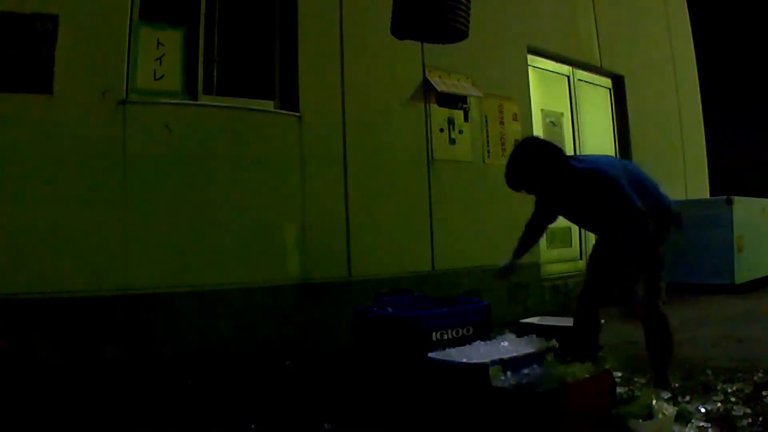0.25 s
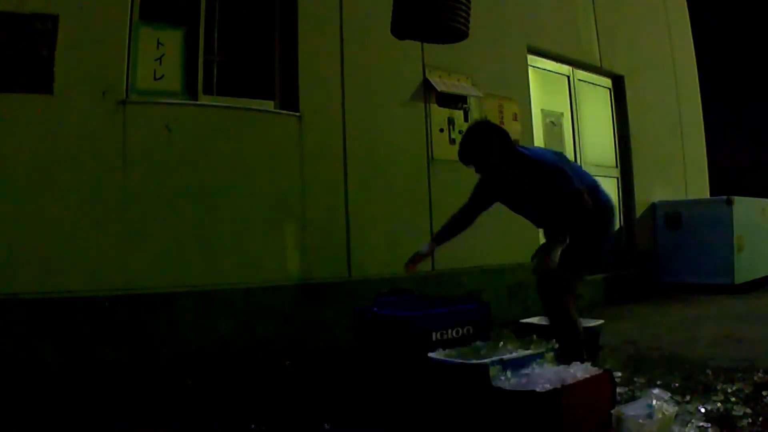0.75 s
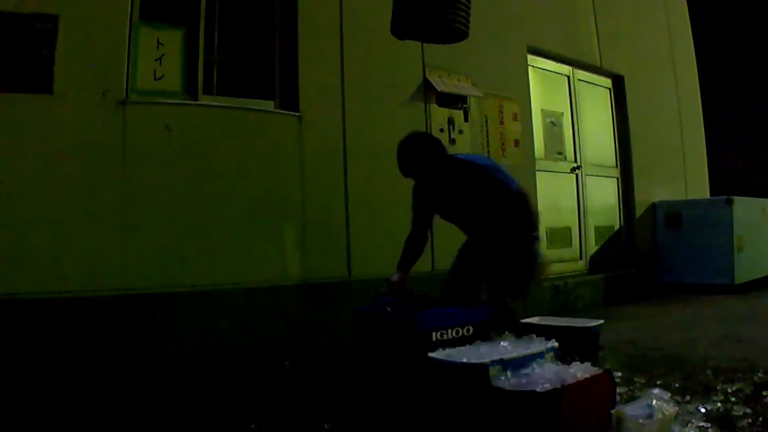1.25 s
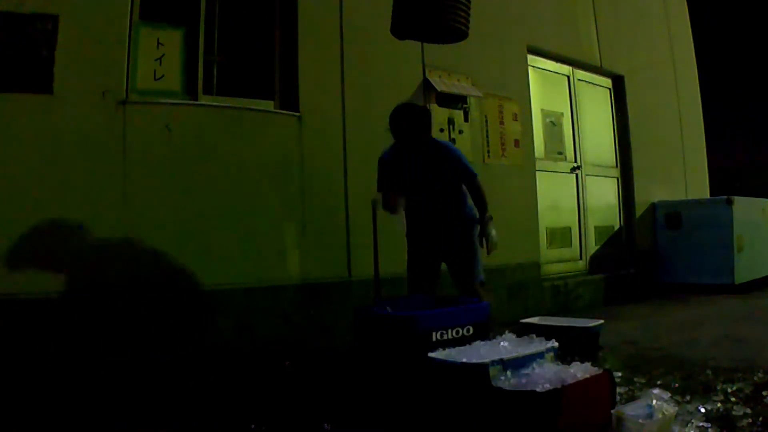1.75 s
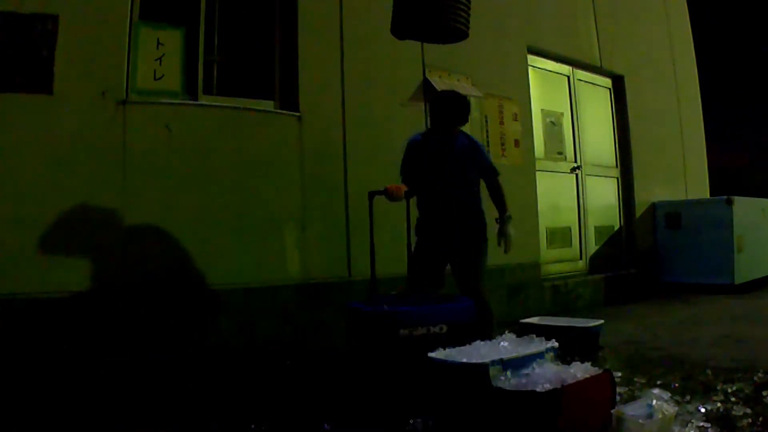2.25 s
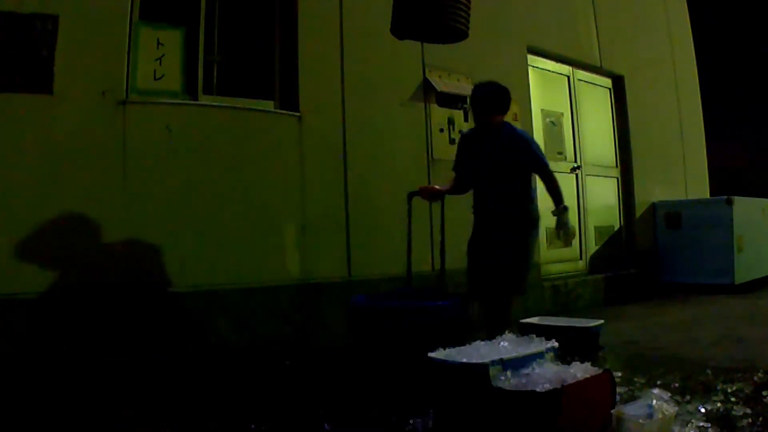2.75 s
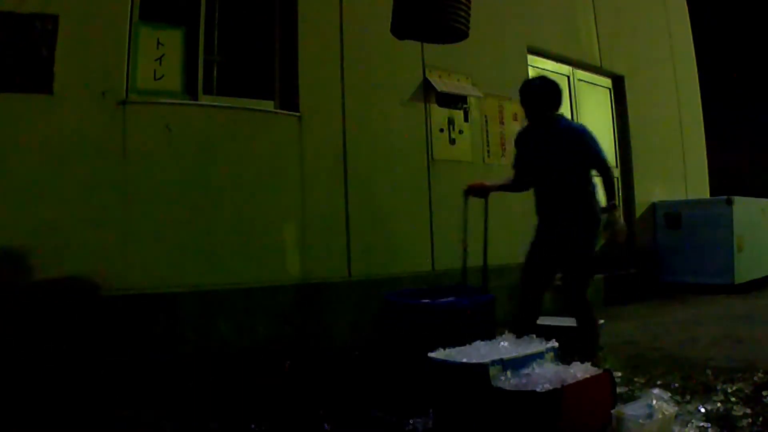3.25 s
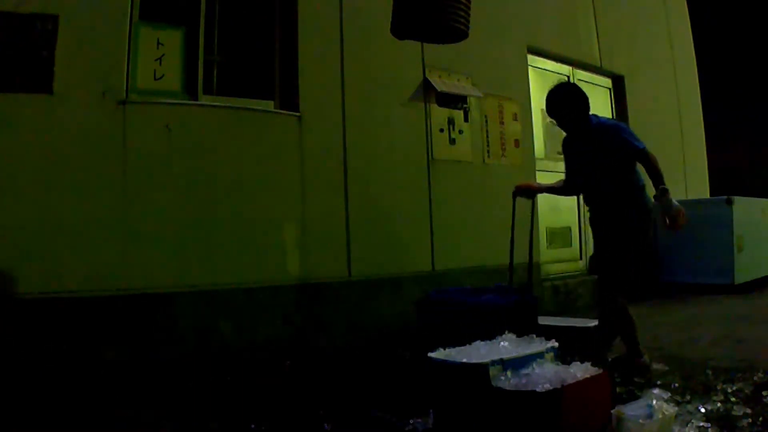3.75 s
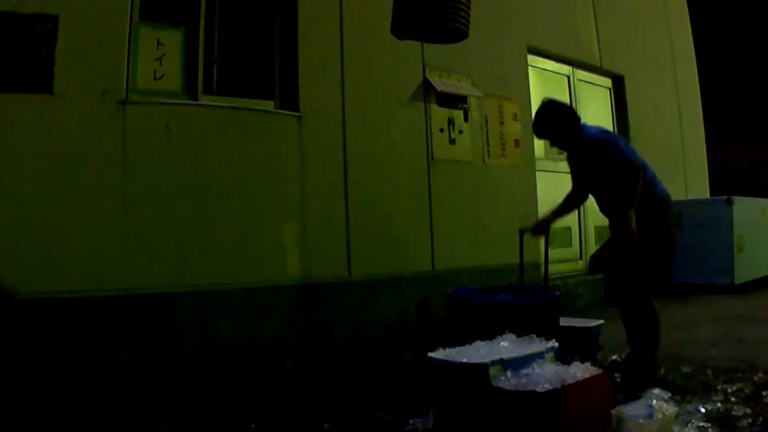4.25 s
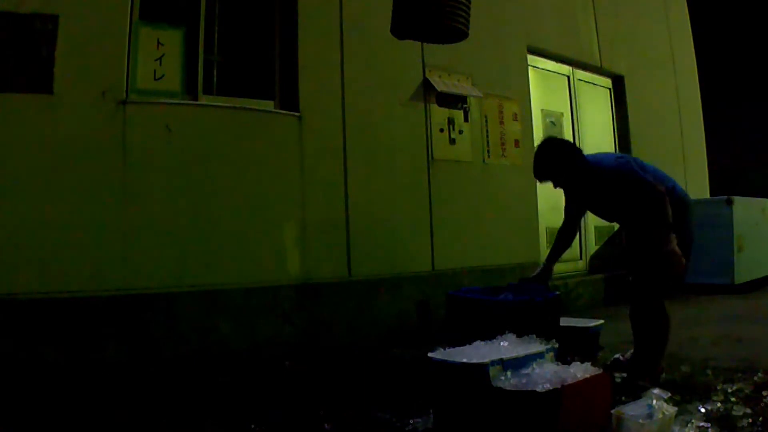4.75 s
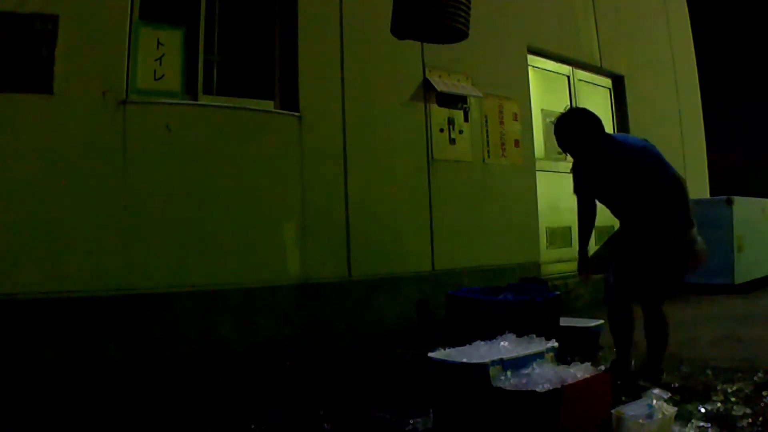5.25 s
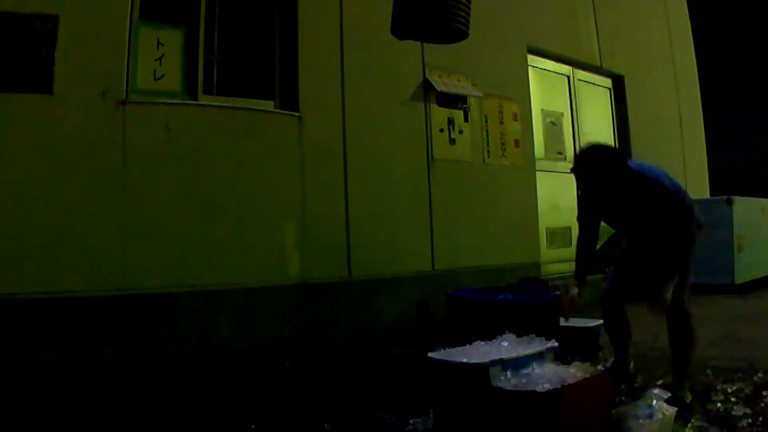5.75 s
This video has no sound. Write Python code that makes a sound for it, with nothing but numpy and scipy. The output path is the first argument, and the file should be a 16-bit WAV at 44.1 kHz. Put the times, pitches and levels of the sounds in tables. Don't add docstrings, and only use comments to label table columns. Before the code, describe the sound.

Sparse ice clacks, then a burst of clattering cubes and grinding gravel as a wheeled cooler rolls, stops with a loud bang, and loose ice is stirred.

```python
import sys
import numpy as np
from scipy import signal
from scipy.fft import rfft, irfft, next_fast_len
from scipy.io import wavfile
from scipy.ndimage import uniform_filter1d, map_coordinates

SR = 44100
rng = np.random.default_rng(int(sys.argv[2]) if len(sys.argv) > 2 else 0)


def to_wav(sig):
    pcm = np.clip(np.atleast_2d(sig), -1, 1) * 32767
    pcm = np.round(pcm).astype(np.int16)
    wavfile.write(sys.argv[1], SR, pcm.T)


def to_linear_factor(level_db):
    exponent = np.asarray(level_db, float) / 20
    return 10 ** exponent


N = 264803

# (time [s], peak level [dB], main ring [Hz], tick level [dB])
REACHING = [(0.175, -36, 2830, -67), (0.225, -38, 3640, -58.5), (0.29, -29.5, 1160, -67),
            (0.311, -24.5, 970, -66), (0.455, -31, 2586, -56), (0.501, -31, 3120, -58.5),
            (0.736, -37.5, 910, -57), (0.93, -29.5, 1590, -71), (1.035, -41.5, 2090, -85.5),
            (1.096, -31, 2350, -61.5), (1.17, -38.5, 2430, -57.5), (1.362, -31, 1180, -71),
            (1.402, -29.5, 690, -51), (1.495, -40, 888, -75), (1.7, -28.5, 1590, -77.5),
            (1.725, -23.5, 1564, -68.5), (1.754, -25, 2820, -51), (1.76, -26, 1050, -62),
            (1.795, -15.5, 1495, -48), (1.8, -18, 2135, -47), (1.817, -10.5, 1810, -38),
            (1.839, -16, 2140, -56)]
# (time [s], peak level [dB], main ring [Hz], tick level [dB])
STARTING = [(2.11, -33, 1740, -91.5), (2.181, -26, 1785, -55), (2.222, -17.5, 1930, -46.5),
            (2.231, -17.5, 2160, -47), (2.256, -35.5, 2430, -70.5), (2.278, -26, 1665, -47.5),
            (2.308, -22.5, 2670, -51.5), (2.339, -26.5, 2230, -40), (2.389, -13, 2780, -48),
            (2.414, -14.5, 1884, -51), (2.448, -18, 1433, -42), (2.474, -18.5, 2430, -53),
            (2.517, -27.5, 2520, -70.5), (2.64, -29, 1650, -61), (2.664, -21.5, 2270, -48),
            (2.712, -22.5, 2100, -58), (2.771, -22, 2560, -60.5), (2.791, -24, 2810, -70),
            (2.828, -20, 2060, -39.5), (2.874, -24, 2427, -69), (2.908, -22.5, 1230, -50)]
# (time [s], peak level [dB], main ring [Hz], tick level [dB])
ROLLING = [(3.006, -23, 2530, -61.5), (3.049, -25, 2940, -77), (3.117, -22.5, 2500, -52.5),
           (3.147, -17.5, 1520, -51.5), (3.197, -27.5, 836, -50), (3.203, -22, 1267, -62.5),
           (3.226, -27, 1950, -67.5), (3.289, -15.5, 2800, -57.5), (3.302, -10, 2495, -50),
           (3.315, -17, 2100, -46.5), (3.381, -22.5, 1170, -48), (3.619, -21, 1530, -65),
           (3.624, -28.5, 1514, -68), (3.677, -20, 2590, -76), (3.798, -20, 1590, -76.5),
           (3.802, -33, 1865, -77.5), (3.929, -17, 1820, -50)]
# (time [s], peak level [dB], main ring [Hz], tick level [dB])
PARKING = [(4.162, -21, 3286, -49.5), (4.23, -35.5, 2310, -78.5), (4.28, -24.5, 3096, -61),
           (4.294, -16, 2220, -51), (4.302, -21, 2300, -50), (4.364, -25.5, 1410, -58.5),
           (4.442, -32, 1480, -83.5), (4.489, -26.5, 2090, -77), (4.526, -24, 1240, -70.5),
           (4.564, -31, 960, -65.5), (4.597, -26, 2290, -82.5), (4.641, -4, 1520, -45.5),
           (4.646, -6.5, 2070, -59), (4.659, -32, 1873, -69), (4.75, -28, 2340, -83.5),
           (4.831, -25, 2484, -54.5), (5.027, -34.5, 2420, -80)]
# (time [s], peak level [dB], main ring [Hz], tick level [dB])
STIRRING = [(5.116, -46, 599, -53), (5.177, -35.5, 2880, -53), (5.208, -39.5, 2155, -68.5),
            (5.227, -39.5, 2510, -55), (5.274, -24, 2360, -56.5), (5.366, -21.5, 1152, -59),
            (5.53, -25.5, 2580, -65), (5.603, -29, 770, -77), (5.617, -25.5, 1450, -71),
            (5.641, -27.5, 2363, -53), (5.67, -24, 1210, -51.5), (5.704, -31.5, 2640, -61),
            (5.773, -25.5, 1346, -54), (5.816, -48.5, 1320, -81), (5.898, -19.5, 1164, -41.5),
            (5.915, -15.5, 1236, -60.5), (5.933, -20, 1540, -62), (5.997, -19.5, 972, -58.5)]
# (knocks, 60 dB decay [ms])
ACTIONS = [(REACHING, 79), (STARTING, 82), (ROLLING, 96), (PARKING, 49), (STIRRING, 62)]
# (time [s], effort level [dB], centre of the clatter [Hz])
EFFORT = [(0, -48.5, 2290), (.3, -71.5, 2353), (.4, -56, 2340), (1.0, -49.5, 2360), (1.6, -53, 2294),
          (1.72, -44.5, 1864), (1.95, -53.5, 2066), (2.17, -43, 1900), (2.25, -31, 2105), (2.6, -37, 2113),
          (3.1, -38.5, 2400), (3.5, -35, 2027), (4.0, -35.5, 2205), (4.15, -46, 2656), (4.95, -62, 1986),
          (5.25, -48, 2530), (5.5, -59.5, 2450), (6, -40.5, 2390)]
# (frequency [Hz], gain [dB])
GRIT_TONE = [(3000, -18.5), (4500, -18), (5500, -11.5), (7000, -6), (15000, -9.5)]
HIGH_DB = 30


def unit(x):
    return x / np.sqrt(np.mean(x ** 2) + 1e-20)


def along(points, hz):
    f, v = np.transpose(points)
    return np.interp(np.log(hz + 1), np.log(f + 1), v)


def curves(rows):
    s, *columns = np.transpose(rows)
    return [np.interp(np.arange(N) / SR, s, column) for column in columns]


def wobble(rate):
    knots = rng.standard_normal(int(N * rate / SR) + 4)
    return map_coordinates(knots, [np.arange(N) * rate / SR])


def filtered(x, response):
    m = next_fast_len(N + SR // 2)
    return irfft(rfft(x, m) * response(np.fft.rfftfreq(m, 1 / SR)), m)[..., :N]


def causal(points):
    def response(hz):
        cepstrum = irfft(np.log(to_linear_factor(along(points, hz))))
        half = len(cepstrum) // 2
        cepstrum[1:half] *= 2
        cepstrum[half + 1:] = 0
        return np.exp(rfft(cepstrum, len(cepstrum)))
    return response


def patchy(x, depth_db):
    z = signal.stft(x, nperseg=256)[2]
    field = rng.standard_normal(z.shape[-2:])
    field = uniform_filter1d(field, size=7, axis=0)
    field = uniform_filter1d(field, size=9, axis=1)
    return signal.istft(z * to_linear_factor(depth_db * unit(field)), nperseg=256)[1][..., :N]


def contacts(per_s, spread_db):
    hit = rng.random(N) < per_s / SR
    size_db = spread_db * np.minimum(rng.exponential(size=N), 3.5)
    return unit(hit * rng.standard_normal(N) * to_linear_factor(size_db))


def clatter(centre_hz, per_s, cycles, spread):
    count = int(per_s * N / SR)
    draw = rng.standard_normal((count, 2))
    start = rng.integers(0, N, count)
    hz = centre_hz[start] * np.exp(spread * draw[:, 0])
    turns = np.outer(hz, np.arange(SR // 120) / SR)
    rings = to_linear_factor(5.5 * draw[:, 1:]) * np.sin(2 * np.pi * turns) * np.exp(-turns / cycles)
    at = start[:, None] + np.arange(SR // 120)
    return unit(np.bincount(at.ravel(), rings.ravel())[:N])


def knock(db, hz, tick_db, t60_ms):
    t = np.arange(SR // 8) / SR
    noise = rng.standard_normal((5, len(t)))
    fade = to_linear_factor(-60 * t * 1000 / max(t60_ms, 4)) * (1 - np.exp(-(t * 1000 + 0.053) / 0.44))
    fade /= fade.max()
    blows = (np.abs(noise[0]) > 2.5) * noise[0] * 0.26 * fade
    blows[0] = 0.64
    ratios, sizes = np.exp(rng.normal(0, 0.296, 4)), to_linear_factor(rng.normal(-16, 3.8, 4))
    modes = np.sin(2 * np.pi * hz * t) + sizes @ np.sin(2 * np.pi * hz * np.outer(ratios, t))
    ring = signal.fftconvolve(blows, modes * to_linear_factor(-60 * t / 0.015))[:len(t)]
    around = signal.butter(N=1, Wn=[hz / 2.5, hz * 1.3], btype="band", fs=SR, output="sos")
    rattle = unit(signal.sosfilt(around, noise[1])) * fade
    body = ring / np.abs(ring).max() + 0.41 * rattle
    edge_hz = rng.uniform(4000, 6500)
    band = [edge_hz, edge_hz * rng.uniform(1.6, 3)]
    bright = signal.butter(N=2, Wn=band, btype="band", fs=SR, output="sos")
    tick = signal.sosfilt(bright, noise[2] + 0.5 * noise[3:])
    tick *= to_linear_factor(tick_db + HIGH_DB - 2.0) * fade * (1 - np.exp(-t / 0.0021))
    return to_linear_factor(db - 6.0) * body + tick


def knocks():
    out = np.zeros((2, N + SR))
    for rows, t60_ms in ACTIONS:
        for s, db, hz, tick_db in rows:
            sound = knock(db, hz, tick_db, t60_ms * (hz / 2000) ** 0.68)
            out[:, round(s * SR):][:, :sound.shape[1]] += sound
    return out[:, :N]


def clinks():
    # (time [s], peak level [dB], ring [Hz])
    early = [(0.29, -30.5, 795), (0.295, -39, 2480), (0.31, -32.5, 824), (0.334, -40.5, 2110),
             (0.454, -42, 1440), (0.512, -45, 2620), (0.738, -40, 2530), (0.93, -40, 2230),
             (0.937, -40, 1320), (1.404, -39, 2400), (1.495, -42, 950), (1.563, -41.5, 816),
             (1.709, -41.5, 2840), (1.724, -38.5, 2870), (1.753, -36.5, 2230), (1.758, -36, 605),
             (1.762, -33, 3000), (1.762, -38, 1950), (1.797, -30, 1495), (1.8, -23.5, 3080),
             (1.803, -21, 2120), (1.817, -23, 3570), (1.817, -21, 1090), (1.826, -21.5, 1820),
             (1.84, -22.5, 3110), (1.841, -29.5, 2120), (1.849, -34, 1370), (1.851, -31, 583),
             (1.854, -34, 1710), (1.914, -35.5, 770), (2.116, -30.5, 1810)]
    # (time [s], peak level [dB], ring [Hz])
    rolling = [(2.231, -26.5, 3870), (2.231, -28, 2160), (2.234, -29, 1320), (2.257, -36, 2470),
               (2.285, -27, 1630), (2.31, -28.5, 2560), (2.34, -34, 2150), (2.401, -25, 2400),
               (2.407, -25, 2430), (2.518, -30.5, 2450), (2.639, -31.5, 2480), (2.642, -34, 1620),
               (2.674, -27.5, 3066), (2.674, -39.5, 1770), (2.677, -39, 2560), (2.754, -32.5, 2550),
               (2.793, -30, 2150), (2.832, -31, 3020), (2.834, -28.5, 1294), (2.838, -28, 3270),
               (2.908, -30.5, 1990), (2.908, -28.5, 3060), (3.006, -32.5, 2745), (3.038, -28.5, 2080),
               (3.049, -31.5, 2050), (3.058, -30.5, 2480), (3.076, -36.5, 2390), (3.118, -41, 2480),
               (3.147, -23.5, 1514), (3.197, -28, 855), (3.204, -25.5, 1236), (3.214, -30, 1250),
               (3.227, -26.5, 2780), (3.286, -25, 890), (3.29, -30.5, 2116), (3.309, -24, 1780),
               (3.309, -27.5, 1200), (3.315, -22.5, 2500), (3.322, -20, 2010), (3.339, -25.5, 3090),
               (3.426, -29.5, 1320), (3.45, -33, 1610), (3.47, -29.5, 1600), (3.58, -27, 2190),
               (3.619, -26.5, 1570), (3.624, -26.5, 2300), (3.624, -24.5, 1570), (3.633, -30.5, 2330),
               (3.679, -30, 2930), (3.684, -27.5, 1940), (3.93, -34, 2780), (3.937, -24, 1860),
               (3.935, -31, 2970), (3.943, -23, 1687), (3.946, -25.5, 3020), (3.957, -28.5, 2630),
               (4.007, -33.5, 2280), (4.017, -33, 2880)]
    # (time [s], peak level [dB], ring [Hz])
    late = [(4.163, -36.5, 2620), (4.163, -40, 3370), (4.163, -32.5, 1000), (4.171, -38.5, 1040),
            (4.175, -35.5, 2420), (4.231, -35.5, 3260), (4.28, -39.5, 1840), (4.286, -36.5, 2920),
            (4.304, -25, 2420), (4.306, -31.5, 1490), (4.321, -36.5, 3130), (4.443, -33, 1570),
            (4.454, -39, 1630), (4.52, -38, 1240), (4.525, -36.5, 1990), (4.527, -40, 2950),
            (4.616, -37.5, 2380), (4.645, -20, 2755), (4.652, -17.5, 1620), (4.66, -20.5, 2310),
            (4.656, -19.5, 1050), (4.684, -26.5, 2010), (4.713, -33.5, 865), (4.719, -32, 680),
            (5.17, -39, 2900), (5.178, -39, 2840), (5.209, -38, 2130), (5.229, -33.5, 2580),
            (5.227, -31.5, 690), (5.236, -40, 2700), (5.251, -38.5, 2690), (5.257, -39.5, 2610),
            (5.274, -38, 2410), (5.28, -33.5, 1230), (5.287, -34.5, 2450), (5.3, -34.5, 2340),
            (5.366, -29, 1230), (5.372, -34.5, 1160), (5.373, -36.5, 3140), (5.528, -32.5, 3330),
            (5.529, -31.5, 2600), (5.535, -44, 1570), (5.541, -31, 2420), (5.627, -37, 2180),
            (5.628, -36.5, 1230), (5.67, -31, 3900), (5.677, -34, 2980), (5.776, -38, 3390),
            (5.899, -31.5, 2130), (5.901, -30.5, 3020), (5.955, -34.5, 3640), (5.922, -37, 3150),
            (5.922, -26, 1250), (5.977, -35.5, 3130)]
    out, t = np.zeros(N + SR), np.arange(SR // 25) / SR
    rise_s, t60_s = 0.00095, 0.018
    fade = to_linear_factor(7 - 60 * t / t60_s) * (1 - np.exp(-t / rise_s))
    for s, db, hz in [*early, *rolling, *late]:
        out[round(s * SR):][:len(t)] += to_linear_factor(db) * fade * np.sin(2 * np.pi * hz * t)
    return out[:N]


def snaps():
    # (time [s], peak level [dB], ring [Hz])
    edge_snaps = [(0.292, -21.5, 1170), (0.31, -17.5, 1170), (1.8228, -7, 1800), (1.841, -7.5, 2170),
                  (2.233, -10, 2260), (2.39, -8.5, 2500), (2.416, -12, 1910), (2.475, -13, 2450),
                  (2.827, -27, 2040), (3.1972, -15, 1300), (3.228, -13, 2300), (3.3035, -12, 2380),
                  (3.314, -17.5, 2070), (3.15, -14.5, 1480), (4.163, -12, 3200), (4.446, -24, 1560),
                  (4.640, -5.5, 2850), (5.171, -24, 2920), (5.228, -15, 2600), (5.275, -17, 2400),
                  (5.366, -12, 1070), (5.529, -17.5, 2720), (5.67, -17, 1190), (5.898, -20.5, 1160),
                  (5.9149, -5.5, 1400),
                  (5.118, -22.5, 4400),
        (5.137, -26.5, 4200),
        (0.556, -28.5, 3030),
        (1.754, -28.5, 1990),
        (5.3, -25.5, 2430),
        (5.968, -16, 3450),
    ]
    out, t = np.zeros(N + SR), np.arange(SR // 50) / SR
    for s, db, hz in edge_snaps:
        out[round(s * SR):][:len(t)] += to_linear_factor(db - 3.5) * to_linear_factor(-60 * t / 0.0034) * np.sin(2 * np.pi * hz * t)
    return out[:N] + 0.5 * np.roll(out, round(0.0087 * SR))[:N]


def spikes():
    # (time [s], peak level [dB])
    cracks = [(1.755, -53.5), (2.228, -53.5), (2.39, -52), (2.83, -40.5), (2.876, -51.5), (2.908, -48.5),
              (3.292, -47), (3.304, -46), (3.317, -41.5), (3.55, -52), (4.051, -50), (4.298, -48.5),
              (5.12, -60.5)]
    out, t = np.zeros(N + SR), np.arange(SR // 100) / SR
    for s, db in cracks:
        fade = to_linear_factor(db + HIGH_DB + 6 - 60 * t / 0.004)
        out[round(s * SR):][:len(t)] += fade * rng.standard_normal(len(t))

    def treble(hz):
        return (1j * hz / (1j * hz + 6000)) ** 3 * to_linear_factor(5.3 * np.log2(1 + hz / 9000))
    return filtered(out[:N], treble)


def chips():
    # (time [s], level [dB])
    chimes = [
        (5.177, -25.5),
        (5.532, -22),
    ]
    t = np.arange(N) / SR
    tone = np.sin(2 * np.pi * 7100 * t)
    return sum(to_linear_factor(db - 60 * np.abs(t - s) / 0.056) * (t > s) * tone for s, db in chimes)


def scrape():
    # (start [s], end [s], first pitch [Hz], last pitch [Hz], level [dB])
    slides = [
        (5.115, 5.175, 4400, 3900, -45),
        (5.176, 5.33, 2950, 2210, -49.5),
        (5.615, 5.72, 3870, 3100, -51.5),
        (5.93, 6.05, 4100, 3000, -44.5),
    ]
    t = np.arange(N) / SR
    times = np.ravel([row[:2] for row in slides])
    pitches = np.ravel([row[2:4] for row in slides])
    hz = np.interp(t, times, pitches)
    strokes = np.zeros(N)
    for start, end, *_, db in slides:
        strokes += to_linear_factor(db) * np.clip((t - start) / 0.0036, 0, 1) * np.clip((end - t) / 0.028, 0, 1)
    return to_linear_factor(2.0 * wobble(40)) * strokes * clatter(hz, per_s=1500, cycles=4.9, spread=0.12)


def thumps():
    # (time [s], peak level [dB], ring [Hz])
    bumps = [(1.492, -32.5, 170), (1.753, -31.5, 305), (1.802, -14.5, 169), (1.822, -15.5, 198),
             (1.82, -17, 281), (1.906, -29, 227), (2.109, -32, 289), (2.244, -20, 196),
             (2.408, -28.5, 142.3), (2.409, -21, 389), (2.476, -30.5, 203), (2.997, -32, 190),
             (3.146, -18, 192.3), (3.144, -26, 453), (3.403, -26.5, 214), (3.575, -29, 190),
             (3.854, -26.5, 191.5), (3.933, -26.5, 178), (4.035, -40, 201), (4.599, -29.5, 191),
             (4.6439, -7.5, 197.6), (5.273, -31, 381), (5.36, -38, 375), (5.662, -37, 448)]
    t60_s, hold_s = 0.19, 0.023
    out, t = np.zeros(N + SR), np.arange(SR // 4) / SR
    dull = signal.butter(N=2, Wn=[110, 450], btype="band", fs=SR, output="sos")
    damping = 0.24 + 0.72 / (1 + (t / hold_s) ** 6)
    for s, db, hz in bumps:
        flap = unit(signal.sosfilt(dull, rng.standard_normal(len(t))))
        fade = to_linear_factor(db - 2.5 - 60 * t / t60_s) * (1 - np.exp(-t / 0.003)) * damping
        out[round(s * SR):][:len(t)] += fade * (np.sin(2 * np.pi * hz * t) + 0.45 * flap)
    return out[:N]


def shaking():
    # (time [s], level [dB], half width [s])
    surges = [(.235, -45.5, 0.044), (2.225, -49, 0.0085), (2.31, -41, 0.013), (2.345, -35, 0.019),
              (2.53, -41, 0.031), (2.675, -32, 0.03), (2.76, -35, .04), (3.045, -31.5, 0.04),
              (3.17, -32, 0.039), (3.3, -26.5, 0.015), (3.46, -31, 0.029), (3.56, -37, 0.02),
              (3.625, -30.5, 0.036), (3.685, -34.5, 0.016), (3.73, -39, 0.027), (3.88, -40, .03),
              (3.945, -29, 0.025), (4.01, -36.5, 0.032), (4.3, -35, 0.0082)]
    jolt_db, jolt_t60_s = -17.5, 0.25
    jolts, t, now = np.zeros(N), np.arange(SR // 2) / SR, np.arange(N) / SR
    for rows, _ in ACTIONS:
        for s, db, *_ in rows:
            jolts[min(round(s * SR), N - 1)] += to_linear_factor(2 * (min(db, -13) + jolt_db))
    settling = to_linear_factor(-120 * t / jolt_t60_s)
    power = to_linear_factor(2 * curves(EFFORT)[0]) + np.abs(signal.fftconvolve(jolts, settling)[:N])
    for s, db, width in surges:
        power += to_linear_factor(2 * db) * np.exp(-((now - s) / width) ** 2)
    return 10 * np.log10(power)


def scuffs():
    # (time [s], more grit [dB], half width [s])
    wheel_scuffs = [
        (1.6, 1.5, 0.041),
        (2.96, -10, 0.055),
        (3.25, -7, 0.039),
        (2.46, -2, .03),
        (2.58, -10, .05),
        (3.18, 2, 0.032),
        (3.46, -1.5, 0.022),
        (3.56, 3, 0.018),
        (3.83, -12.5, .05),
        (4.85, -13, .05),
    ]
    now = np.arange(N) / SR
    return sum(db * np.exp(-((now - s) / width) ** 2) for s, db, width in wheel_scuffs)


def drag():
    # (frequency [Hz], gain [dB])
    crunch_tone = [(100, -26.5), (500, -28), (1000, -5), (1600, -0.5), (2500, 2.5), (4000, -8), (6000, 0),
                   (9000, -48.5)]
    crunch_db, centre_hz = shaking(), curves(EFFORT)[1]
    grit_db = -63.5 + 0.75 * (crunch_db + 38.0) + scuffs()
    clumps = 2.0 * wobble(35) + wobble(110)
    grains = contacts(3000, spread_db=2) + 0.7 * rng.standard_normal(N)
    grind = unit(patchy(filtered(grains, causal(crunch_tone)), depth_db=1.0))
    jostle = clatter(centre_hz, per_s=820, cycles=9.2, spread=0.2904)
    crunch = unit(to_linear_factor(clumps) * (grind + 0.55 * jostle))
    wide = unit(to_linear_factor(clumps) * filtered(rng.standard_normal(N), causal(crunch_tone)))
    crunch = crunch + 0.33 * np.array([wide, -wide])
    fine = np.array([contacts(4700, spread_db=4.5) for stream in range(3)])
    fine = (fine[0] + 1.3 * fine[1:]) * to_linear_factor(1.3 * clumps + 1.3 * wobble(15))
    grit = unit(patchy(filtered(fine, causal(GRIT_TONE)), depth_db=2.5))
    return to_linear_factor(crunch_db - 2.5) * crunch, to_linear_factor(HIGH_DB + grit_db) * grit


def placed(x):
    # (time [s], delay of the left port [ms])
    bearing = [
        (0, 0.0081),
        (1.2, 0.02),
        (1.8, 0.0015),
        (3.9, 0.0062),
        (4.6, 0.0054),
        (5.2, 0.076),
        (6, 0.079),
    ]
    late = curves(bearing)[0] * SR / 2000
    return np.array([map_coordinates(port, [np.arange(N) - side * late]) for port, side in zip(x, (1, -1))])


def wall(x):
    # (frequency [Hz], 60 dB decay [s])
    decay = [(200, 0.13), (2000, 0.073), (10000, 0.13)]
    hz, t, z = signal.stft(rng.standard_normal((2, SR // 4)), SR, nperseg=256)
    tail = signal.istft(z * to_linear_factor(-60 * t / along(decay, hz)[:, None]), SR, nperseg=256)[1]
    tail[1] = 0.4 * tail[0] + 0.98 * tail[1]
    late = np.pad(x.mean(axis=0), (round(0.008 * SR), 0))[None]
    return signal.fftconvolve(late, tail / np.linalg.norm(tail[0]), axes=1)[:, :N]


def night():
    # (time [s], level [dB])
    hum_level = [
        (0.0, -45.5),
        (2.1, -44.5),
        (2.31, -43),
        (4.68, -43.5),
        (5.03, -46),
        (6.0, -45.5),
    ]
    # (frequency [Hz], gain [dB])
    hum_tone = [(20, -11.5), (60, -2), (200, 3.5), (350, -0.5), (550, -7.5), (850, -4.5), (1500, -12.5),
                (2500, -17), (5000, -42), (15000, -9)]
    # (frequency [Hz], likeness [1 = the same])
    alike = [(60, 1.0), (110, 0.99), (200, 0.99), (350, 0.92), (640, 1.0), (1160, 0.71), (2100, 0.11),
             (3790, 0.14), (9000, .3)]

    def shared_and_apart(hz):
        turn = np.arccos(np.clip(along(alike, hz), -1, 1)) / 2
        return to_linear_factor(along(hum_tone, hz)) * [np.cos(turn), np.sin(turn)]
    pair = rng.standard_normal((2, N)) * to_linear_factor(0.8 * wobble(12))
    mid, side = filtered(pair, shared_and_apart)
    return to_linear_factor(curves(hum_level)[0] + 4.5) * unit(np.array([np.roll(mid + side, 1), mid - side]))


def hiss():
    air = rng.standard_normal((3, N))
    tinted = filtered(air[0] + 4.3 * air[1:], lambda hz: to_linear_factor(along(GRIT_TONE, hz)))
    return to_linear_factor(-76.5 + HIGH_DB) * unit(tinted)


def scene():
    crunch, grit = drag()
    light = lambda hz: (1j * hz / (1j * hz + 180)) ** 2
    ice = knocks() + snaps() + clinks() + chips() + scrape()
    near = filtered(ice + crunch, light)
    return placed(near + grit) + thumps() + to_linear_factor(-9.5) * wall(near) + night() + hiss() + spikes()


def roll_off(x):
    return signal.sosfilt(signal.butter(12, 14800, fs=SR, output="sos"), x)


def record(dry):
    # (frequency [Hz], gain [dB])
    housing_tone = [(15, -26.5), (45, -5.5), (90, -5), (2900, 1), (3600, -2.5), (4500, -12.5), (5700, -26),
                    (7000, -28), (9500, -24.5), (12000, -34.5), (13500, -44), (15000, -69)]
    # (frequency [Hz], level [dB])
    louder_left = [(60, -5.5), (95, 0.5), (150, -4.0), (240, -3.0), (380, -3.0), (600, -7.5), (950, -4.5),
                   (1510, -2.5), (2390, -1.5), (3790, 3.0), (8000, 4), (12000, -6.0)]
    # (frequency [Hz], phase [radians])
    lead = [(0, -1.7), (520, 0.36), (1290, 0.52), (1890, 0.95), (2150, 1.0), (2580, 0.84), (3360, 0.9),
            (3960, 1.0), (6000, 1.57), (9000, 1.63), (14000, 2.7)]
    housing = causal(housing_tone)

    def response(hz):
        left_over_right = to_linear_factor(along(louder_left, hz)) * np.exp(1j * along(lead, hz))
        ports = left_over_right ** np.array([[0.5], [-0.5]])
        notch = 1 - 0.8 / (1 + ((hz - 7990) / 70) ** 2)
        return ports * notch * housing(hz)
    return roll_off(filtered(dry, response))


dry = scene()
out = record(dry)
to_wav(out)
```